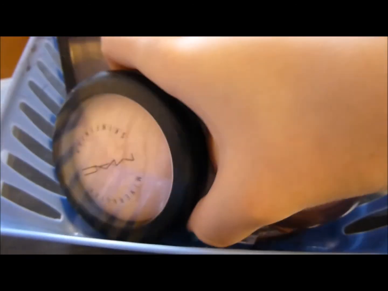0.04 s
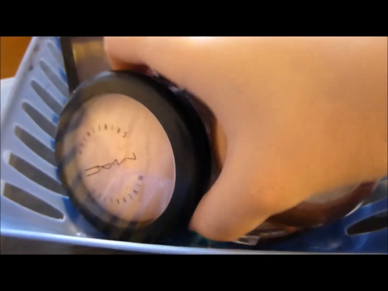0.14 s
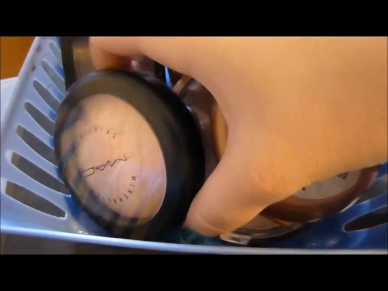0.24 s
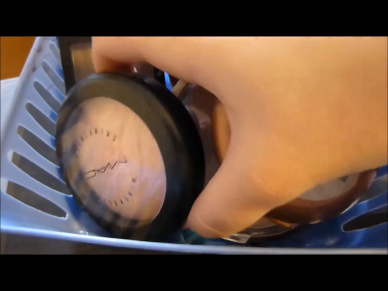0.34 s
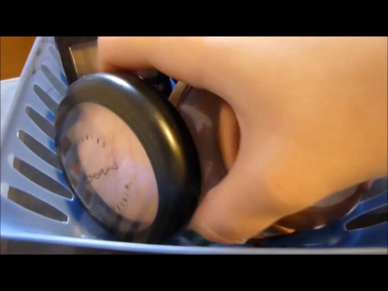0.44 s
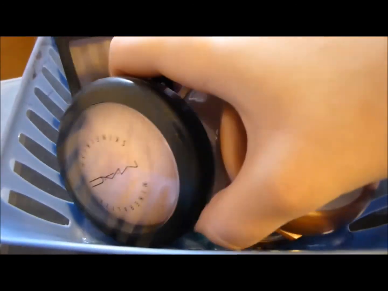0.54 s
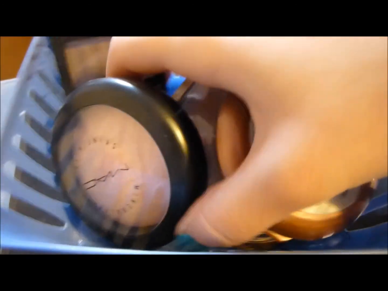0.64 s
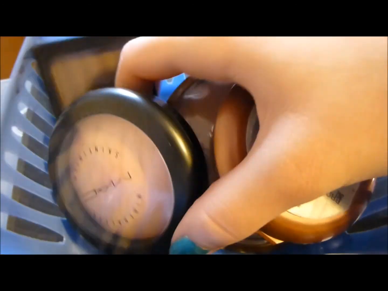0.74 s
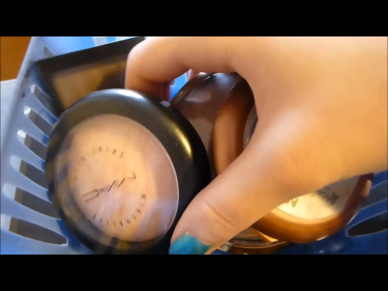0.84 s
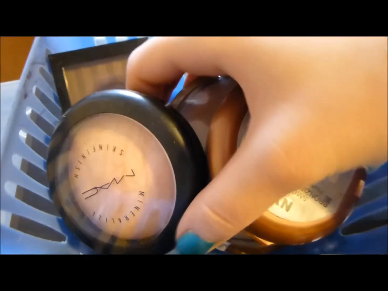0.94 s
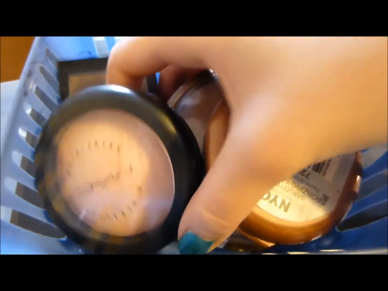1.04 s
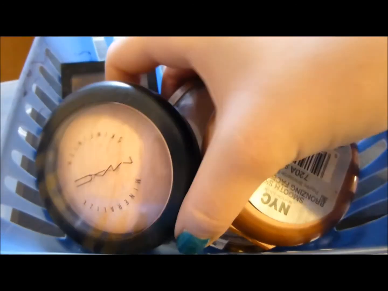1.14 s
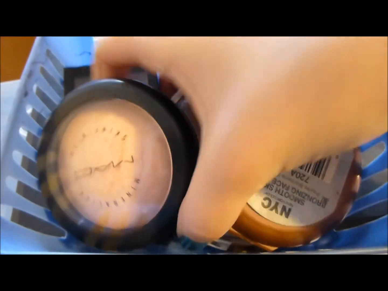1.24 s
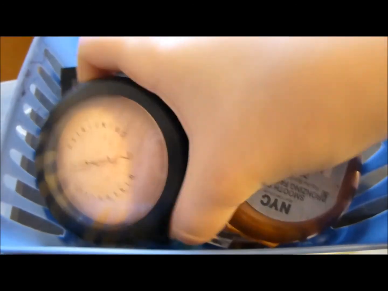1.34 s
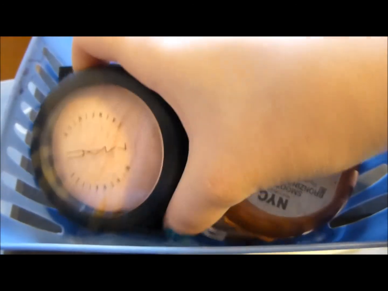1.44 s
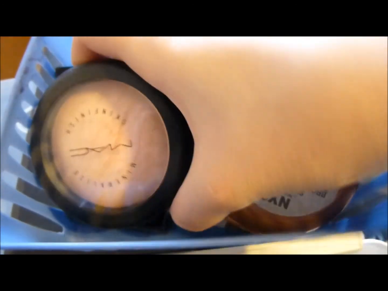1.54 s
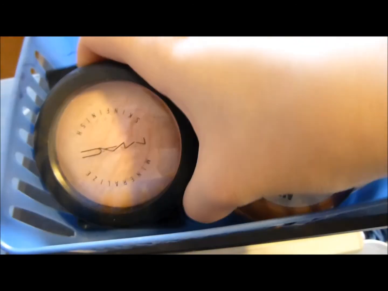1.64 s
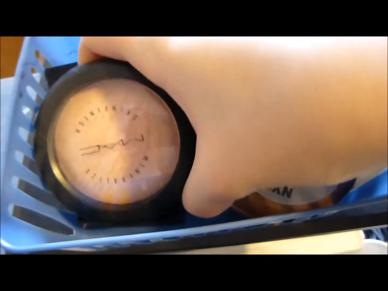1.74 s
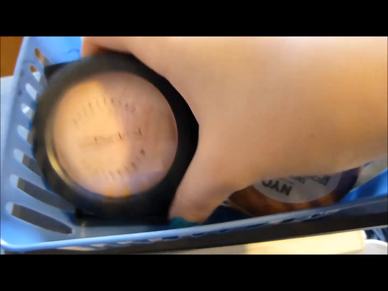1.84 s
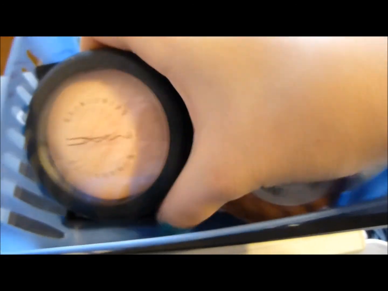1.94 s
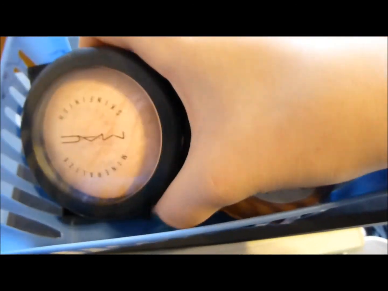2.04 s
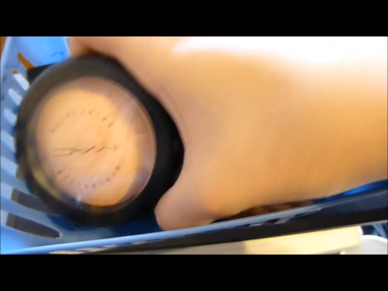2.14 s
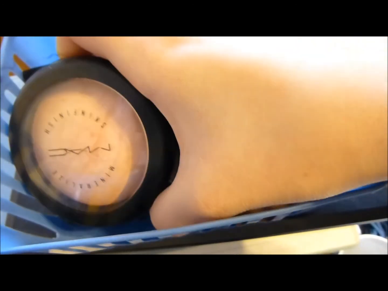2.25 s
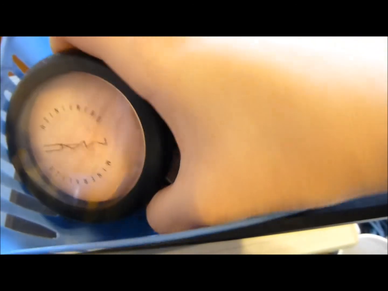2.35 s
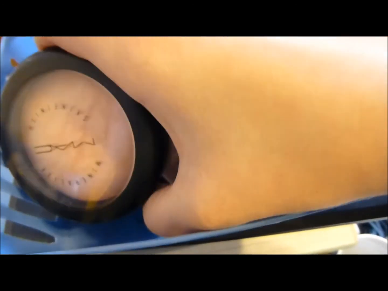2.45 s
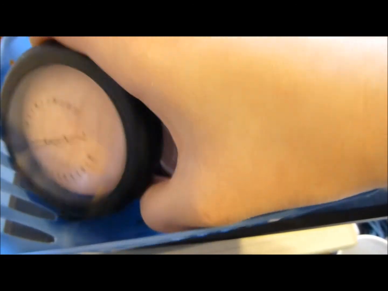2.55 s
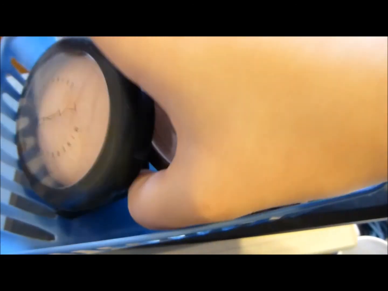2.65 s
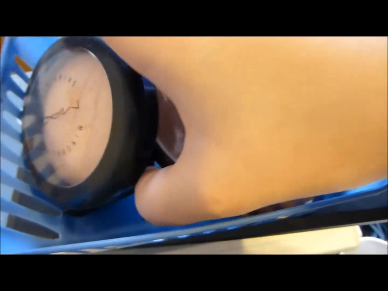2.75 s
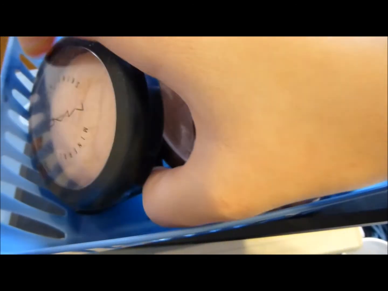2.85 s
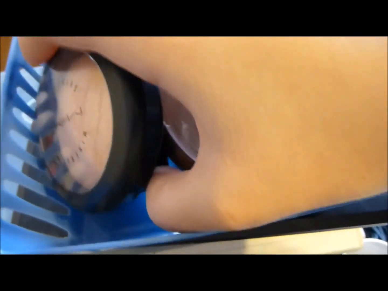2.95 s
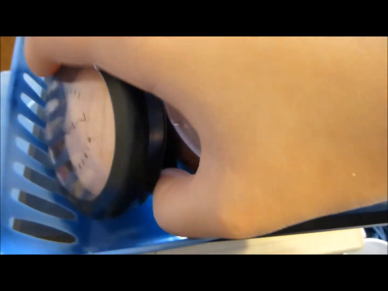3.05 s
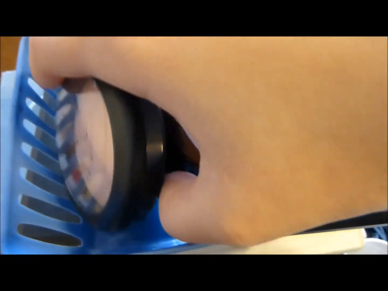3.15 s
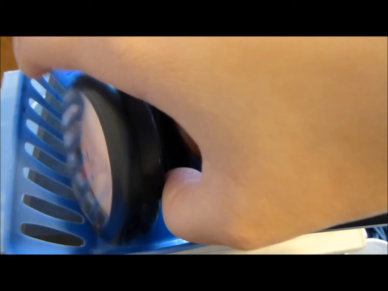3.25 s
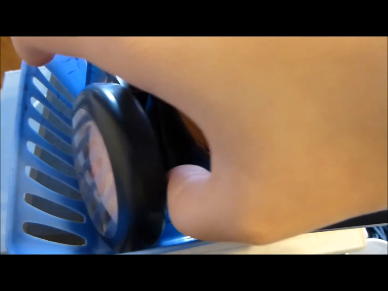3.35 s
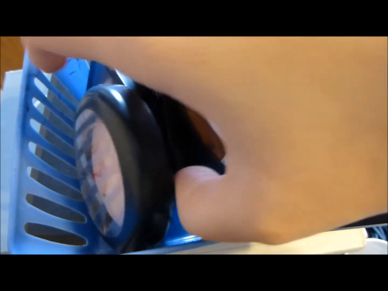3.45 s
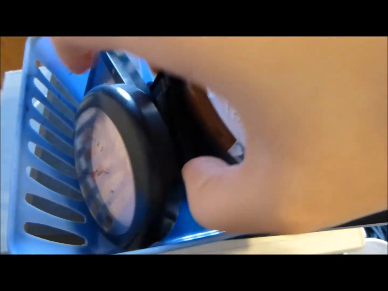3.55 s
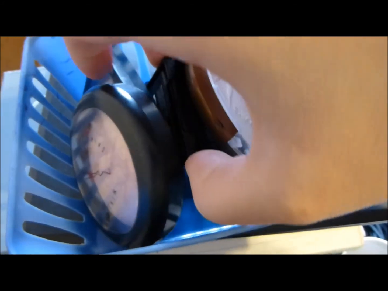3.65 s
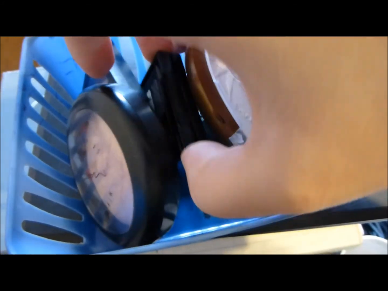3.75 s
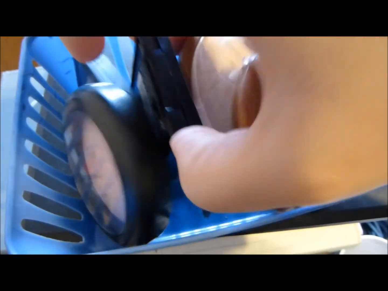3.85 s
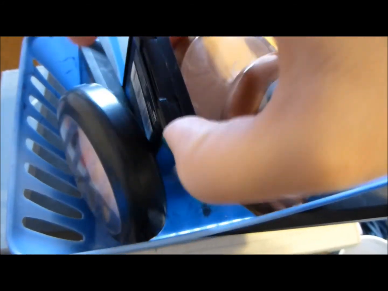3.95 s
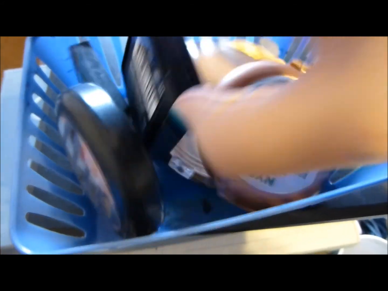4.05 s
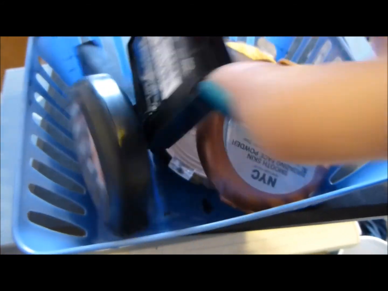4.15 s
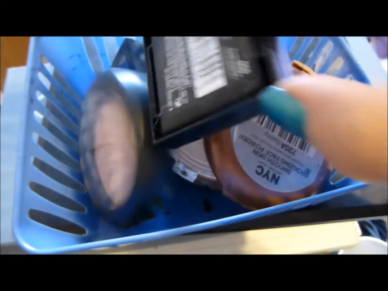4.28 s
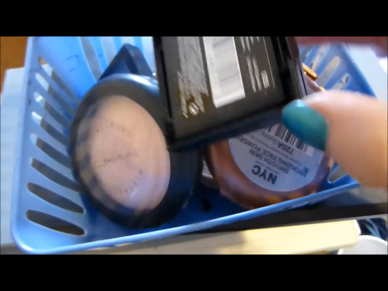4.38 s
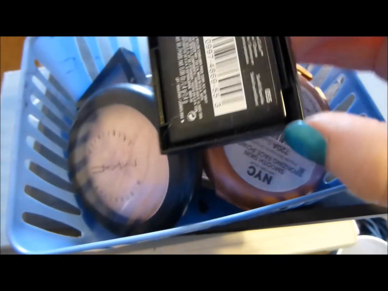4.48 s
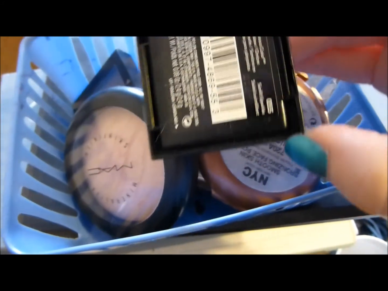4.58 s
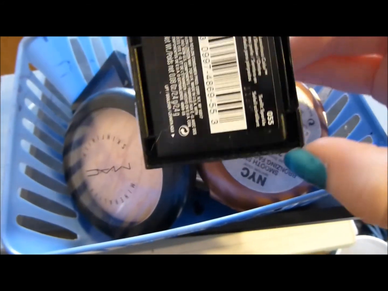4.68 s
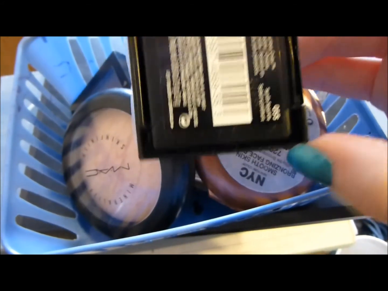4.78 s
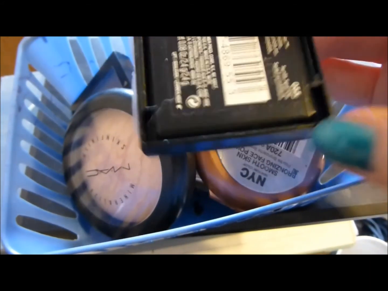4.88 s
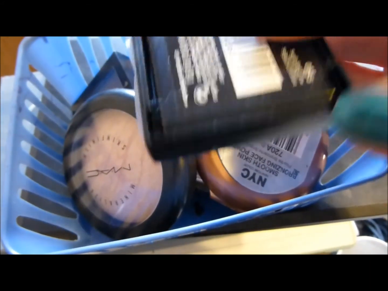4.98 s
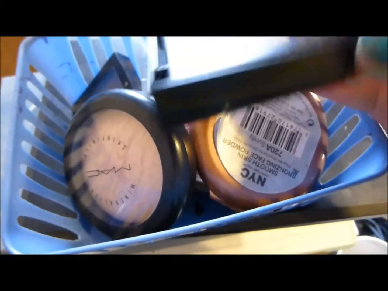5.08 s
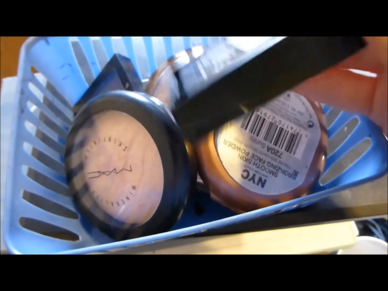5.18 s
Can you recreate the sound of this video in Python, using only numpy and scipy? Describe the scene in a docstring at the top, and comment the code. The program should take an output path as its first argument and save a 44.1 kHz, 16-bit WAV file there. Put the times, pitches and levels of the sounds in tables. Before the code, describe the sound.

Hollow plastic cases knock, click and scrape together in a plastic basket as a hand rummages through them, close up in a quiet small room.

```python
"""In a small room, close by, a hand rummages through plastic make-up compacts in a plastic basket.
Each contact is a short graze, a hollow knock of a case, a click of its hard edge and a thump of the basket.
Knocks are damped notes and noise; clicks and thumps are a push with a dying chatter, coloured by filters.
Between contacts the cases rub and slide, which is filtered noise with random slips, and tick lightly.
Noise-like echoes answer each contact, the table booms once, and faint air lies behind it all."""
import sys
import numpy as np
from scipy import signal
from scipy.fft import rfft, irfft, next_fast_len
from scipy.io import wavfile
from scipy.ndimage import uniform_filter1d, map_coordinates

SR = 44100
rng = np.random.default_rng(int(sys.argv[2]) if len(sys.argv) > 2 else 0)


def digitize_waveform(pressure):
    """Quantize a signal to 16-bit integers and store it at the path in sys.argv[1].

    Rows of a 2-D input are taken as channels; values are limited to [-1, 1].
    """
    field = np.atleast_2d(pressure).T
    bounded = np.clip(field, -1, 1)
    quanta = np.round(bounded * 32767).astype(np.int16)
    wavfile.write(sys.argv[1], SR, quanta)


N = 230063


def amp(db):
    """Turn decibels into a gain."""
    return 10 ** (np.asarray(db) / 20)


def unit(x):
    """Scale x to an average (RMS) strength of 1."""
    return x / np.sqrt(np.mean(x ** 2) + 1e-20)


def along(points, hz):
    """Read a curve of (pitch_hz, value) points, spaced by the logarithm of pitch."""
    point_hz, value = np.transpose(points)
    return np.interp(np.log(hz + 1), np.log(point_hz + 1), value)


def fade(t, t60):
    """A dying-away that has dropped by 60 dB after t60 seconds."""
    return np.exp(-np.log(1000) * t / t60)


def wobble(rate):
    """A smooth random curve with rate random points a second."""
    points = rng.standard_normal(int(N * rate / SR) + 4)
    return map_coordinates(points, [np.arange(N) * rate / SR])


def coloured(x, spectrum):
    """Filter x to the gains in (pitch_hz, level_db) points, without any sound ahead of its cause."""
    n = x.shape[-1]
    m = 2 * next_fast_len(n)
    gain = amp(along(spectrum, np.fft.rfftfreq(m, 1 / SR)))
    # folding the cepstrum gives the filter the least possible delay
    cepstrum = irfft(np.log(gain), m)
    cepstrum[1:m // 2] *= 2
    cepstrum[m // 2 + 1:] = 0
    return irfft(rfft(x, m) * np.exp(rfft(cepstrum)), m)[..., :n]


def peaked(x, size):
    """Scale x so that its envelope, smoothed over size samples, peaks at 1."""
    power = np.abs(signal.hilbert(x)) ** 2
    return x / np.sqrt(uniform_filter1d(power, size).max())


def add(track, s, x):
    """Mix x into the track from second s on."""
    start = max(round(s * SR), 0)
    part = x[:, :N - start]
    track[:, start:start + part.shape[1]] += part


# colour of the faint air; columns: pitch_hz, level_db
AIR_COLOUR = [(15, -42.5), (25, -2.5), (59, -7), (161, -0.5), (301, 0), (489, -4), (641, -5), (1330, -11.5),
              (1520, -10.5), (3340, -18), (5000, -15.5), (13600, -18.5), (16000, -45.5)]


def room_tone():
    """Faint steady air as filtered noise, narrowest around 200 Hz and widest around 1 kHz."""
    mid, side = unit(coloured(rng.standard_normal((2, N)), AIR_COLOUR))
    side = coloured(side, [(40, 0.5), (200, -5.5), (1000, 9.5), (5000, -2)])
    return amp(-71.0) * np.array([mid + side, mid - side])


BUMP_S, BUMP_DB, BUMP_HZ, BUMP_T60_S = 4.128, -49.5, 85, .18  # a tumble bumps the basket on the table


def table_bump():
    """The table under the basket gives one short, low boom: a damped sine with a soft start."""
    track, t = np.zeros((2, N)), np.arange(SR // 2) / SR
    boom = np.sin(2 * np.pi * BUMP_HZ * t) * fade(t, BUMP_T60_S) * (1 - fade(t, .05))
    add(track, BUMP_S, np.outer([1, 0], amp(BUMP_DB) * boom))
    return track


def friction(force, spectrum, slips, slip_db):
    """Surfaces rub with a fine grain and slip at random, about slips times a second; echoes smear it."""
    sizes = amp(3.5 * rng.standard_normal(N)) * rng.choice([-1, 1], N)
    jerks = (rng.random(N) < slips / SR) * sizes
    texture = rng.standard_normal(N) + amp(slip_db) * unit(jerks)
    grains = unit(coloured(texture * amp(4.2 * wobble(55)), spectrum))
    t = np.arange(SR // 3) / SR
    # echo power: a quick decay and a much weaker long one
    decay = fade(t, .06) ** 2 + amp(-25.5) * fade(t, .28) ** 2
    lingering = np.sqrt(np.abs(signal.fftconvolve(force ** 2, decay / decay.sum())[:N]))
    wash = amp(-1) * lingering * unit(coloured(rng.standard_normal((2, N)), spectrum))
    return wash + np.outer([1, 0], force * grains)


STILL_DB = -70  # handling at or below this level counts as still

# how busily the hand shifts among the cases, before the still level is taken off; columns: time_s, level_db
HAND_ACTIVITY = [(0.0, -46), (0.14, -54.5), (0.34, -58.5), (0.99, -51), (1.25, -55), (2.47, -63.5),
                 (2.56, -64), (2.74, -68), (2.97, -58.5), (3.51, -56), (3.66, -59), (3.93, -71),
                 (4.09, -56.5), (4.28, -56), (4.37, -49), (4.52, -73), (4.6, -68.5)]


def effort():
    """The hand's activity as a gain, almost nothing when it is still."""
    level_db = np.interp(np.arange(N) / SR, *np.transpose(HAND_ACTIVITY), right=STILL_DB)
    return np.maximum(amp(level_db) - amp(STILL_DB), 1e-6)


RUSTLE_DB, HISS_DB = -9.5, -14  # body and hiss of the rubbing, relative to the hand's activity

# colour of hollow cases being rubbed; columns: pitch_hz, level_db
RUB_COLOUR = [(40, -40.5), (100, -18), (180, -7.5), (350, -4.5), (700, -4.5), (1000, 2.5), (1500, -3.5),
              (2200, -10.5), (3500, -30.5), (8000, -26)]
# colour of the thin surface hiss; columns: pitch_hz, level_db
HISS_COLOUR = [(900, -42.5), (2200, -3), (3500, 1), (4800, 0.5), (6500, -5.5), (9000, -6), (13000, -15.5),
               (16000, -16.5)]


def handling():
    """Fingers and cases rub softly for as long as the hand moves."""
    rustle = friction(amp(RUSTLE_DB) * effort(), RUB_COLOUR, slips=42, slip_db=-2.5)
    hiss = friction(amp(HISS_DB) * effort(), HISS_COLOUR, slips=30, slip_db=-3)
    return rustle + hiss


SKID_HISS_DB, SKID_BODY_DB = -38.5, -29.5  # every clear contact skids a little: relative to its knock_db
SKID_RISE_S, SKID_FALL_S = .02, .019
SLIDE_FALL = 0.84  # fall time of a slide, as a share of its rise time

# clear contacts, levels before a small trim common to each kind of sound;
# columns: start_s, knock_db, pitch_hz, click_db, thump_db
CLEAR_CONTACTS = [(0.0221, -15.5, 1356, -34.5, -70), (.031, -21, 1090, -41, -42.5),
                  (0.0442, -23, 805, -34, -46), (0.1211, -26.5, 790, -45, -47.5),
                  (0.173, -41, 1080, -45.5, -49.5), (0.2505, -31.5, 1010, -46.5, -43),
                  (0.2667, -30.5, 1180, -39, -53), (0.2844, -25.5, 1470, -45, -37.5),
                  (.306, -27.5, 720, -37, -39), (.364, -30.5, 930, -52, -71),
                  (0.4194, -39.5, 1010, -63, -48.5), (0.5921, -12, 1160, -55, -40.5),
                  (.5983, -11.5, 1390, -22.5, -32.5), (0.6038, -15.5, 1600, -40.5, -35),
                  (0.6552, -23.5, 1524, -45, -40.5), (0.7221, -36.5, 797, -27, -44.5),
                  (0.8308, -19.5, 1150, -24.5, -49), (0.8463, -14, 884, -30, -50.5),
                  (0.8828, -18, 1445, -29.5, -39), (0.9001, -23.5, 910, -39, -38),
                  (0.9812, -31, 1140, -35, -42), (.985, -28.5, 1006, -67, -39),
                  (1.1191, -10, 950, -29, -39), (1.2836, -29, 1040, -44, -52), (1.3094, -41, 887, -52, -45),
                  (1.4618, -42, 1060, -47.5, -51), (1.5294, -33, 1090, -48.5, -53),
                  (1.6685, -33.5, 1290, -51, -41), (1.8522, -42, 1160, -58, -58),
                  (1.885, -40.5, 770, -46, -61), (1.9193, -35, 1280, -51, -67),
                  (2.0339, -26, 1425, -41.5, -42), (2.1427, -40, 1010, -65, -53),
                  (2.182, -29, 1035, -47.5, -58), (2.25, -40.5, 650, -46.5, -44),
                  (2.3758, -19, 1350, -35.5, -39), (2.4374, -21, 2220, -34.5, -59),
                  (2.4495, -17, 2195, -24.5, -27.5), (2.476, -33, 927, -38, -61),
                  (2.592, -27, 1140, -51, -49), (2.635, -16.5, 1490, -36, -40),
                  (2.6506, -20.5, 1515, -34.5, -45), (2.6735, -13, 1340, -29, -33),
                  (2.7167, -24.5, 900, -38.5, -37.5), (2.978, -52.5, 990, -49, -50),
                  (3.045, -44.5, 807, -61, -48), (3.3516, -9.5, 997, -28, -26.5),
                  (3.3745, -26, 990, -54, -39), (3.4098, -27, 1080, -39.5, -36.5),
                  (3.5278, -33.5, 800, -47, -41), (3.5399, -27.5, 1530, -34.5, -38),
                  (3.5553, -28.5, 885, -50, -62), (3.666, -40, 1015, -56, -59),
                  (3.914, -26.5, 885, -65.5, -54), (4.0563, -36, 1530, -40.5, -51),
                  (4.075, -29, 1430, -53.5, -48), (4.123, -9.5, 1274, -26, -32),
                  (4.13, -23, 673, -33, -26.5), (4.152, -30, 716, -55.5, -32),
                  (4.1607, -15, 1020, -21, -30.5), (4.207, -23.5, 880, -55, -61),
                  (4.2156, -27.5, 856, -52, -55.5), (4.2438, -29, 878, -66.5, -54),
                  (4.253, -33, 900, -71, -60), (4.2955, -30, 1015, -60, -57),
                  (4.32, -34.5, 960, -46.5, -47), (4.375, -13.5, 1710, -30, -34),
                  (4.3833, -14, 1670, -32, -41), (4.47, -19.5, 995, -37, -37),
                  (4.4964, -30.5, 915, -41.5, -52)]
# slides of one case along another, before a common trim; columns: peak_s, rise_s, hiss_db, body_db
CASE_SLIDES = [(0.499, 0.034, -64, -57), (1.066, 0.014, -52, -44), (1.524, 0.023, -53.5, -51.5),
               (1.673, 0.045, -57.5, -46.5), (1.713, 0.0071, -34, -52), (1.919, 0.01, -46, -51.5),
               (1.986, 0.0076, -43, -55), (2.217, 0.026, -55.5, -53), (2.423, 0.012, -42.5, -41),
               (3.301, .028, -60.5, -70), (3.871, 0.0089, -65, -48), (3.92, 0.036, -53.5, -45),
               (4.087, 0.021, -49, -45.5), (4.143, 0.013, -50, -39), (4.295, 0.03, -70, -52),
               (4.36, 0.01, -40, -54), (4.464, 0.005, -66, -38.5), (4.975, 0.018, -71, -78),
               (5.17, 0.042, -78, -80)]
# a skidding edge excites the high resonances of a lid; columns: pitch_hz, level_db
SKID_COLOUR = [(900, -18.5), (2200, -4.5), (2900, -4.5), (3450, -4), (3750, -1.5), (4200, 1.5), (5100, 1),
               (6500, -7.5), (9000, -2), (13000, -15), (16000, -25)]


def slides():
    """Cases skid around contacts and slide between them: a surface hiss and a hollow murmur."""
    skids = [(s, SKID_RISE_S, SKID_FALL_S, knock_db + SKID_HISS_DB, knock_db + SKID_BODY_DB)
             for s, knock_db, *_ in CLEAR_CONTACTS]
    glides = [(s, rise, SLIDE_FALL * rise, hiss_db, body_db)
              for s, rise, hiss_db, body_db in CASE_SLIDES]
    power = np.zeros((2, N))
    for s, rise, fall, hiss_db, body_db in skids + glides:
        start = max(s - .15, 0)
        t = start - s + np.arange(SR // 3) / SR  # zero at the peak
        stroke = np.exp(-np.abs(t / np.where(t < 0, rise, fall)) ** 0.98)
        add(power, start, np.outer(amp([hiss_db, body_db]), stroke) ** 2)
    hiss_force, body_force = np.sqrt(power)
    hiss = friction(hiss_force, SKID_COLOUR, slips=590, slip_db=-1.0)
    body = friction(body_force, RUB_COLOUR, slips=390, slip_db=5.0)
    return amp(-2.5) * (hiss + body)


TICKS_PER_S, TICK_HZ, TICK_SPREAD_OCTAVES = 4, 1020, 0.084
TICK_DB, TICK_CLICK_DB, TICK_SPREAD_DB = 8.5, -5, 1.5  # relative to the hand's activity, and their scatter


def light_touches():
    """Loose cases tick against each other at random, as strongly as the hand moves them."""
    level_db, touches = 20 * np.log10(effort()), []
    for k in range(int(TICKS_PER_S * N / SR)):
        s = (k + rng.random()) / TICKS_PER_S
        force, size, edge = rng.standard_normal(3)
        hand_db = level_db[int(s * SR)]
        knock_db = hand_db + TICK_DB + TICK_SPREAD_DB * force
        hz = TICK_HZ * 2 ** (TICK_SPREAD_OCTAVES * size)
        click_db = hand_db + TICK_CLICK_DB + TICK_SPREAD_DB * edge
        touches.append((s, knock_db, hz, click_db, hand_db))
    return touches


def excitation(t, t60, chatter):
    """One sharp push with a dying micro-chatter of the touching surfaces."""
    force = rng.standard_normal(len(t)) * fade(t, t60)
    force *= chatter / np.linalg.norm(force)
    force[0] += 1
    return force


def echoed(x, near_db, near_t60, room_db, room_t60):
    """Mid and side of a sound with quick basket echoes and a room tail, drawn anew each time."""
    t = np.arange(SR // 2) / SR
    near = fade(t, near_t60) * (1 - fade(t, 0.021))
    room = fade(t, room_t60) * (1 - fade(t, 0.062))
    near_gain = amp(near_db) * near / np.linalg.norm(near)
    room_gain = amp(room_db) * room / np.linalg.norm(room)
    response = np.hypot(near_gain, room_gain) * rng.standard_normal((2, len(t)))
    response[:, 0] = 1, -.4  # the direct sound comes from the right
    return signal.fftconvolve(x[None], response, axes=1)


# colour of the floor's shudder; columns: pitch_hz, level_db
THUMP_COLOUR = [(30, -27.5), (70, -25.5), (120, -14.5), (175, 1), (300, 9), (500, 4), (800, -12.5),
                (2000, -32)]


def thump(t, t60):
    """The blow pushes the basket floor, which shudders briefly."""
    return peaked(coloured(excitation(t, t60, chatter=0.87), THUMP_COLOUR), size=64)


# average colour of a snapping edge; columns: pitch_hz, level_db
CLICK_COLOUR = [(800, -28), (2000, -8), (3000, 4), (4200, 2.5), (5200, 2.5), (7000, -3), (10000, -8),
                (14000, -17), (16000, -14)]


def click(t, treble_db, t60, colour_db):
    """A hard edge snaps, each time in a slightly different colour; treble_db lifts its top."""
    scatter = np.outer(rng.standard_normal(len(CLICK_COLOUR)), [0, colour_db])
    colour = np.array(CLICK_COLOUR) + scatter
    snap = peaked(coloured(excitation(t, t60, chatter=8.5), colour), size=60)
    return coloured(snap, [(4500, 0), (9000, treble_db)])


# colour of a hollow case; columns: pitch_hz, level_db
HOLLOW_COLOUR = [(200, -24), (500, -9), (800, -2.5), (1100, 2), (1600, -4.5), (2200, -7), (3000, -20.5),
                 (6000, -50.5)]


def graze(t, lead):
    """Surfaces brush each other for lead seconds before they strike: a swelling noise."""
    swell = np.where(t < lead, (t / lead) ** 2, 0)
    return peaked(coloured(rng.standard_normal(len(t)) * swell, HOLLOW_COLOUR), size=24)


FIRM_DB = -21  # knock level of an ordinary firm contact
KNOCK_T60_S, T60_HALVES_DB = 0.018, 39  # the firm knock's ring; it halves for each so many dB harder
SINGING_HZ, SINGING_OCTAVES, SINGING_GAIN = 856, 0.076, 0.91  # a flat case's note, reach, extra share of ring


def ring_time(knock_db, hz):
    """Seconds for a knock to drop 60 dB: shorter when hard, longer near the note of the flat case."""
    singing = np.exp(-(np.log2(hz / SINGING_HZ) / SINGING_OCTAVES) ** 2)
    hardness = 2 ** ((FIRM_DB - knock_db) / T60_HALVES_DB)
    return KNOCK_T60_S * hardness * (1 + SINGING_GAIN * singing)


KINDRED_DB, KINDRED_OCTAVES = -14, .09  # resonances near the knock's pitch rise towards this level

# resonances of cases and basket, before random scatter; columns: pitch_hz, level_db, t60_s
CASE_RESONANCES = [(506, -24, .08), (680, -27, .04), (872, -18, .07), (1020, -18, .05), (1216, -17, .07),
                   (1330, -18, .06), (1481, -16, .06), (1722, -19, .06), (2000, -24, .025),
                   (2320, -28, .05), (3330, -34, .03), (4050, -33, .03)]
# small cases radiate little bass; columns: pitch_hz, level_db
CASE_RADIATION = [(30, -35), (120, -16), (400, 4), (1000, 1.5), (3000, -1), (8000, -11.5)]


def knock(t, hz, t60, hollow_db, hollow_t60):
    """A case's hollow note: one strong damped mode, a cloud of lesser ones and ringing neighbours."""
    note = np.sin(2 * np.pi * hz * t) * fade(t, t60)
    cloud = peaked(coloured(excitation(t, hollow_t60, chatter=1.5), HOLLOW_COLOUR), size=24)
    mode_hz, mode_db, mode_t60 = np.transpose(CASE_RESONANCES)[:, :, None]
    kinship = np.exp(-(np.log2(mode_hz / hz) / KINDRED_OCTAVES) ** 2)
    mode_db = mode_db + (KINDRED_DB - mode_db) * kinship
    strength, detune, polarity = rng.standard_normal((3, len(CASE_RESONANCES), 1))
    waves = np.sin(2 * np.pi * mode_hz * (1 + .008 * detune) * t)
    modes = np.sign(polarity) * waves * fade(t, mode_t60)
    ring = (amp(mode_db - 2 + 2 * strength) * modes).sum(0)
    build_up = 1 - fade(t, 0.098 * t60)  # a longer note starts more slowly
    body = coloured(note * build_up + amp(hollow_db) * cloud + ring, CASE_RADIATION)
    return peaked(body, size=64)


CLICK_TREBLE_DB, TREBLE_GROWS = 1.5, .15  # a firm click's lift from 9 kHz up; more dB per dB of knock


def strike(contacts):
    """Each contact grazes, knocks, clicks and thumps the basket; returns mid and side."""
    track, t = np.zeros((2, N)), np.arange(4096) / SR
    for s, knock_db, hz, click_db, thump_db in contacts:
        lead = rng.uniform(.0015, .004)  # seconds
        add(track, s - lead, amp(knock_db - 18.0) * np.outer([1, -.3], graze(t, lead)))
        body = knock(t, hz, ring_time(knock_db, hz), hollow_db=-5, hollow_t60=.011)
        body = echoed(body, near_db=-10, near_t60=.07, room_db=-19.5, room_t60=.25)
        add(track, s, amp(knock_db - 2) * body)
        treble_db = CLICK_TREBLE_DB + TREBLE_GROWS * (knock_db - FIRM_DB)
        edge = click(t, treble_db, t60=.01, colour_db=1.2)
        edge = echoed(edge, near_db=-4.5, near_t60=.08, room_db=-12, room_t60=.26)
        add(track, s, amp(click_db + 2) * edge)
        floor = thump(t, t60=.023)
        floor = echoed(floor, near_db=-1.5, near_t60=0.065, room_db=-9.0, room_t60=.3)
        add(track, s, amp(thump_db) * floor)
    return track


# left ear minus right ear, shared between both ears; columns: pitch_hz, difference_db
EAR_BALANCE = [(100, -1.1), (400, -0.5), (750, -1.5), (1300, -4), (2400, -2.5), (5000, -1.5), (9000, -0.5),
               (14000, -1.5)]
# gain of the side signal, which sets the width; columns: pitch_hz, level_db
SIDE_WIDTH = [(100, -15), (400, -20.5), (1000, -7.5), (2500, -1.5), (5000, -7), (9000, 0), (15000, 2)]


def scene():
    """All sounds of the basket, spread between left and right, over the air of the room."""
    air = room_tone()
    mid, side = slides() + handling() + table_bump() + strike(CLEAR_CONTACTS) + strike(light_touches())
    side = coloured(side, SIDE_WIDTH)
    half = np.array(EAR_BALANCE) * [1, .5]  # the whole basket lies a little to the right
    left = coloured(mid + side, half)
    right = coloured(mid - side, half * [1, -1])
    return np.array([left, right]) + air


TOP_HZ = 15400


def record(dry):
    """The microphone's band limit: a very steep cut above TOP_HZ."""
    m = next_fast_len(N + SR // 2)
    hz = np.fft.rfftfreq(m, 1 / SR)
    return irfft(rfft(dry, m) / np.sqrt(1 + (hz / TOP_HZ) ** 120), m)[:, :N]


dry = scene()
out = record(dry)
digitize_waveform(out)
```